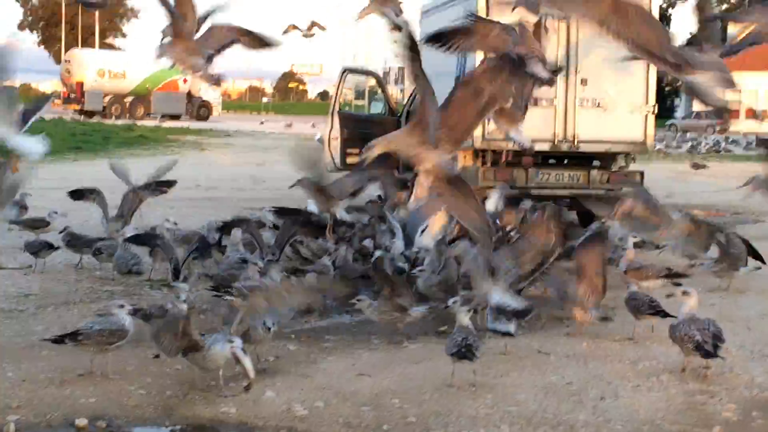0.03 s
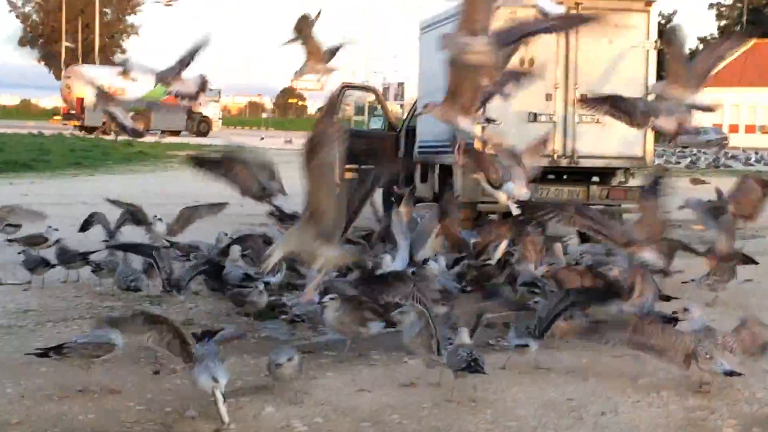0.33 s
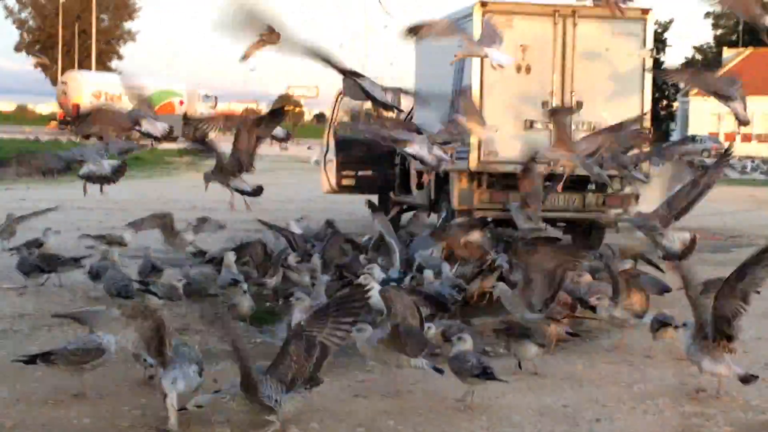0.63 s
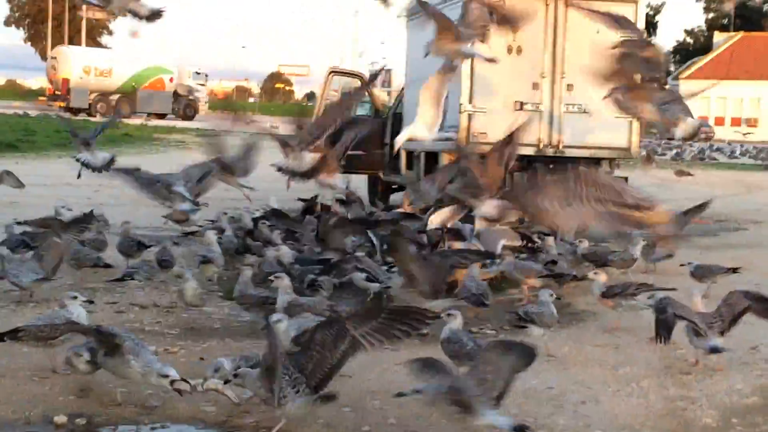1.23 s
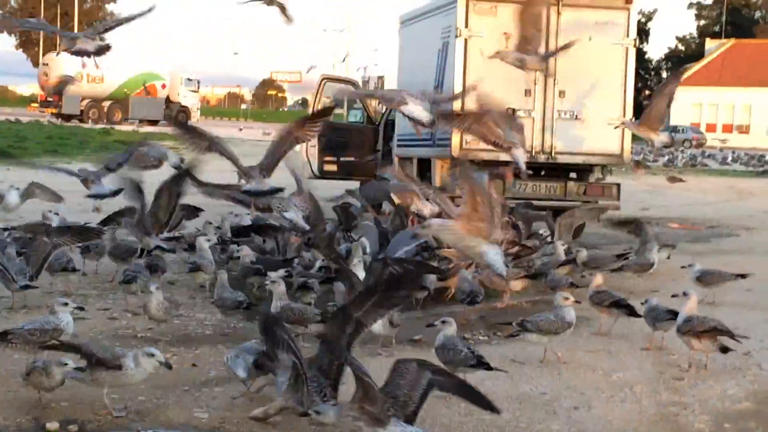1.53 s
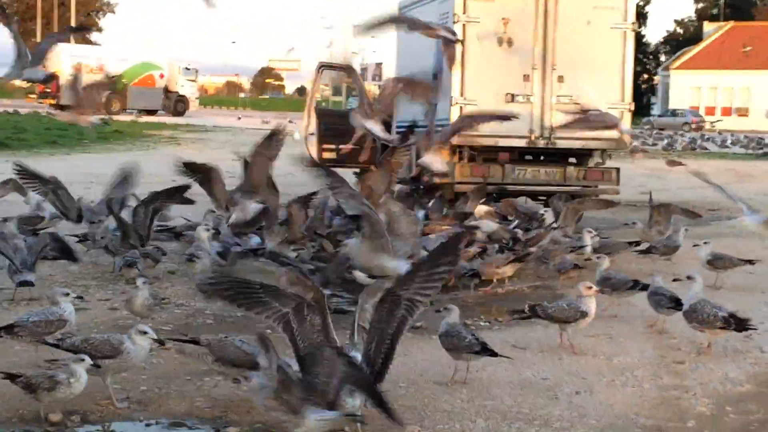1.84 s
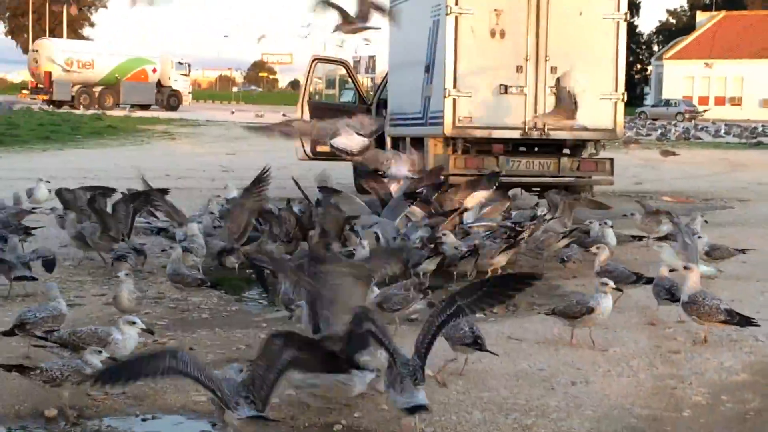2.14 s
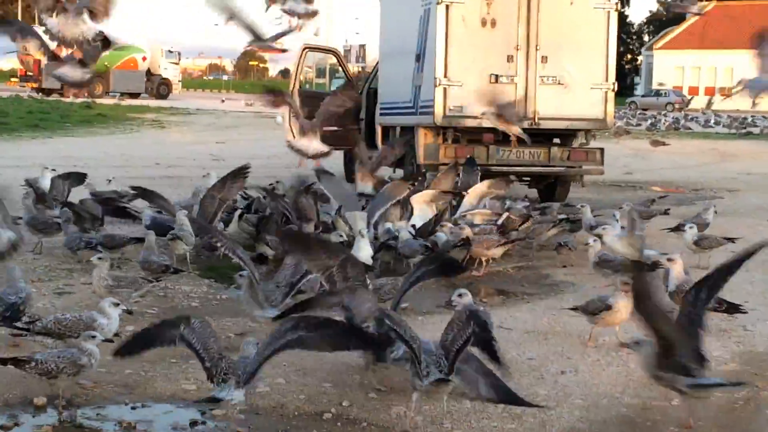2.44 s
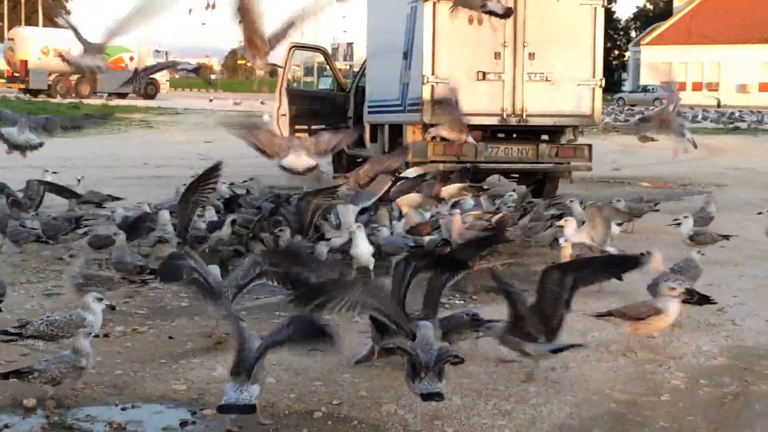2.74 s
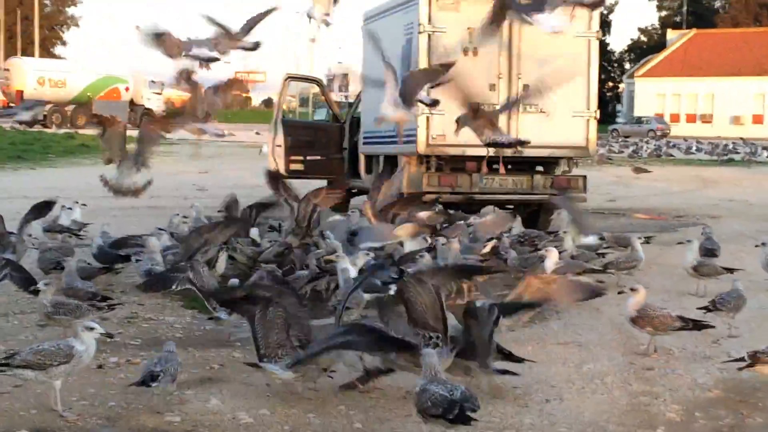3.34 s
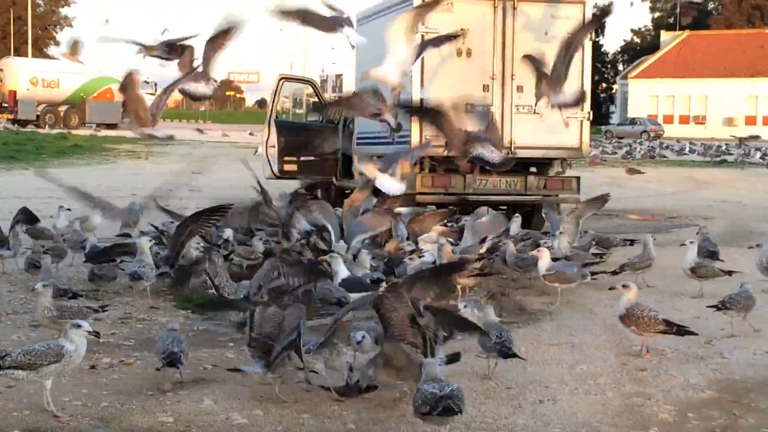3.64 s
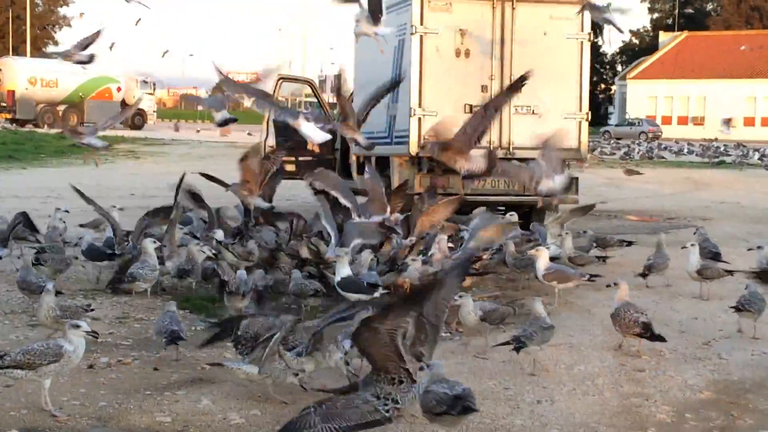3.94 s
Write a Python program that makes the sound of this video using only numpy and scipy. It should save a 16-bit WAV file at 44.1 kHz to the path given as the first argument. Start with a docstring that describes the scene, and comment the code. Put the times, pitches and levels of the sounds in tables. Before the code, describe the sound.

Many gulls squabble with shrill, overlapping cries while their wings thump and flutter.

```python
"""Gulls squabbling over food

A dense flock feeds on open ground behind a parked truck. Near birds squeal over the hoarse,
overlapping cries of the crowd, each cry a gliding stack of harmonics roughened by jitter.
Wings thump and swish as they push the air, and beaks and feet click on the grit."""
import sys
import numpy as np
from scipy.fft import rfft, irfft, next_fast_len
from scipy.io import wavfile
from scipy.ndimage import map_coordinates

SR = 44100
rng = np.random.default_rng(int(sys.argv[2]) if len(sys.argv) > 2 else 0)


def pcm_store(signal):
    """Save signal as 16-bit PCM."""
    levels = np.round(np.clip(np.atleast_2d(signal), -1, 1) * 32767)
    wavfile.write(sys.argv[1], SR, levels.astype(np.int16).T)


N = 176400
TOP_HZ = 15500


def amp(db):
    """Decibels to gain."""
    return 10 ** (np.asarray(db) / 20)


def unit(x):
    """Scale to rms 1."""
    return x / np.sqrt(np.mean(x ** 2) + 1e-20)


def curve(points):
    """Join (seconds, value) points into one value per sample."""
    return np.interp(np.arange(N) / SR, *np.transpose(points))


def wobble(rate, size):
    """A smooth random curve with rate knots a second."""
    knots = rng.standard_normal(1024)
    return map_coordinates(knots, [np.arange(size) * rate / SR], order=2, mode="grid-wrap")


def filtered(x, response):
    """Filter x by a gain given as a function of frequency."""
    size = next_fast_len(N + 8192)
    return irfft(rfft(x, size) * response(np.fft.rfftfreq(size, 1 / SR)), size)[:N]


def coloured(x, colour):
    """x through an EQ curve of (Hz, dB) points, at rms 1."""
    points_hz, db = np.transpose(colour)
    return unit(filtered(x, lambda hz: amp(np.interp(np.log(hz + 1), np.log(points_hz), db))))


def noise(colour):
    """Noise of rms 1 with the given spectrum."""
    return coloured(rng.standard_normal(N), colour)


def add(track, start_s, sound):
    """Mix a sound into the track from start_s."""
    i = round(start_s * SR)
    part = sound[max(-i, 0):max(N - i, 0)]
    track[max(i, 0):][:len(part)] += part


def bursts(events, rise_s, decay_s):
    """An envelope that peaks rise_s after each (seconds, dB) event and dies away."""
    t = np.arange(N) / SR
    envelope = np.zeros(N)
    for start_s, db in events:
        past_peak = t - start_s - rise_s
        envelope += amp(db) * np.exp(-np.maximum(-past_peak / rise_s, past_peak / decay_s).clip(0, 20))
    return envelope


def ground(rustle_db=-9.5, click_db=-5):
    """Beaks and feet strike the grit in sharp clicks, over a fine rustle of feathers and grit."""
    # The scuffle's ebb and flow. Each row: time in seconds, relative level in dB.
    scuffle = [(0.1, -39), (0.36, -32.5), (0.91, -41), (1.07, -33), (1.26, -39.5), (1.27, -36), (1.28, -28),
               (1.34, -35.5), (1.75, -33), (2.05, -43.5), (2.39, -37.5), (2.83, -40.5), (3.98, -35.5),
               (4.0, -43)]
    # Taps on the grit. Each row: start in seconds, relative peak in dB.
    taps = [(0.2464, -34), (1.287, -15), (1.303, -22), (1.3714, -38), (1.4214, -32.5), (1.4524, -31),
            (1.4774, -32), (1.7255, -27)]
    # Airy rustle and brittle click spectra. Each row: frequency in Hz, gain in dB.
    rustle_colour = [(3000, 6), (7000, 12.5), (8500, 9.5), (9700, 9.5), (11000, 3.5), (13000, -3.5),
                     (15000, -26)]
    click_colour = [(1500, -29), (5000, -23), (7000, 4.5), (8300, -17), (9800, 1.5), (11300, -14),
                    (12800, 6), (14000, -23), (15500, -11)]
    rustle = amp(curve(scuffle) + rustle_db + 2.25 * wobble(160, N)) * noise(rustle_colour)
    clicks = bursts(taps, rise_s=0.0003, decay_s=0.0034) * noise(click_colour)
    return rustle + amp(click_db) * clicks


def wings(beat_db=-8.5, flutter_db=-39, rise_s=0.0072, decay_s=0.024):
    """Near downstrokes thump and push puffs of air, over the flutter of many more wings."""
    # Downstrokes. Each row: start in seconds, relative peak in dB, puff over thump in dB.
    beats = [(.10, -30.5, 0), (.19, -35, 7), (0.254, -36, 5), (.385, -32, -1), (.48, -31.5, 1),
             (0.592, -24, -0.5), (.675, -29, -1), (0.784, -36, 5), (0.838, -26.5, -7), (0.893, -27, -3),
             (1.09, -37, 7), (1.28, -29.5, -5), (1.38, -35.5, 1), (1.68, -36, 2), (1.75, -40, 0),
             (1.83, -46, 3), (1.93, -35, 4), (2.02, -34.5, 6), (2.323, -26.5, -11), (2.38, -45, -6),
             (2.58, -36, -6), (2.79, -42, -9), (2.95, -29.5, -10), (3.021, -26.5, -19)]
    # Dull thump, deep puff and broad flutter spectra. Each row: frequency in Hz, gain in dB.
    thump_colour = [(30, -21), (60, -3), (110, 3), (170, -6), (280, -14.5), (1000, -50), (4000, -62)]
    puff_colour = [(20, -20), (40, -13), (60, 22), (85, -14), (160, -45)]
    flutter_colour = [(20, -27), (60, 3.5), (130, -2.5), (250, -9.5), (450, -5.5), (700, -1), (1100, 0.5),
                      (3000, -0.5), (9000, -26), (13000, -21), (15500, -49)]
    thump = bursts([(s, db) for s, db, _ in beats], rise_s, decay_s) * noise(thump_colour)
    puff = bursts([(s, db + deep) for s, db, deep in beats], rise_s, decay_s) * noise(puff_colour)
    flutter = amp(flutter_db + 3 * wobble(21.88, N)) * noise(flutter_colour)
    return amp(beat_db) * (thump + puff) + flutter


def flicker(t, rough, depth_db=1.8, rate_hz=55):
    """The wavering strength of one harmonic, at rms 1; clear cries hold steadier."""
    gains = amp(depth_db * min(rough / .3, 1) * rng.standard_normal(64))
    return unit(np.interp(t * rate_hz, np.arange(len(gains)), gains))


def cry(length_s, pitches, harmonics_db, rough):
    """One gull cry: harmonics on an arched glide, quavering, with jitter and flutter when hoarse."""
    attack_s, release_s = 0.015, 0.013
    quaver_hz, rasp_hz = 90, 650
    t = np.arange(int(max(length_s, .02) * SR)) / SR
    n, progress = len(t), t / t[-1]
    start, middle, end = pitches
    arch = (middle - (start + end) / 2) * (1 - (2 * progress - 1) ** 2)
    hz = start + (end - start) * progress + arch
    hz *= 1 + 0.00803 * wobble(quaver_hz, n) + 0.0492 * rough * wobble(rasp_hz, n)
    phase = (2 * np.pi * np.cumsum(hz) / SR).astype("float32")
    tone = sum(amp(db) * flicker(t, rough) * np.sin(k * phase + rng.uniform(0, 2 * np.pi))
               for k, db in enumerate(harmonics_db, 1))
    envelope = np.clip(t / attack_s, 0, 1) * np.clip((t[-1] - t) / release_s, 0, 1)
    flutter_db = 6.5 * rough * wobble(rasp_hz, n) + 1.88 * wobble(quaver_hz, n)
    return np.sqrt(2) * tone * envelope * unit(amp(flutter_db))


def chorus(pitch_hz, length_s, count, harmonics):
    """Cries scattered through the scene, each with its own pitch, length, glide and hoarseness."""
    out = np.zeros(N)
    for i, (when, pitch, length, fall, arch, rasp) in enumerate(rng.standard_normal((count, 6))):
        hz = pitch_hz * np.exp(.2 * pitch)
        seconds = length_s * np.exp(.4 * length)
        glide = hz * np.array([1, 1 + .035 * arch, 1 - 0.0605 * (1 + fall)])
        rough = min(0.286 * np.exp(rasp / 2), 1)
        harmonics_db = 2 * rng.standard_normal(harmonics)
        centre_s = (i + when) / count * N / SR
        add(out, centre_s - seconds / 2, cry(seconds, glide, harmonics_db, rough))
    return out


def crowd(pitch_hz=1559.7, shrill_hz=3800, yelp_db=-6, babble_db=-3, gruff_db=-51.5):
    """Cries, yelps and gruff calls overlap a distant babble; the din swells and turns shrill in waves."""
    # Swells of the din. Each row: time in seconds, relative level in dB.
    swells = [(.1, -24.5), (.25, -24.5), (.4, -24.5), (.6, -23), (.85, -23), (1.05, -24), (1.3, -22.5),
              (1.55, -23.5), (1.72, -26.5), (1.88, -26.5), (2.05, -27), (2.3, -25), (2.6, -23), (2.9, -24),
              (3.08, -24.5), (3.35, -23.5), (3.5, -28), (3.62, -24), (3.9, -26.5)]
    # Waves of shrillness. Each row: time in seconds, treble shelf gain in dB.
    shrillness = [(.1, 1.5), (.35, 2.5), (.6, 3), (.78, -3), (.88, -6), (1.2, -0.5), (1.4, -4), (1.6, 0.5),
                  (1.87, 3), (2.05, -3.5), (2.3, -0.5), (2.6, -2.5), (2.9, -4.5), (3.15, -11), (3.45, -2),
                  (3.63, 4), (3.78, -1), (4, -0.5)]
    # Spectra of the flock, merged far cries and low calls. Each row: frequency in Hz, gain in dB.
    flock_colour = [(600, -52), (1000, -23.5), (1300, -1), (1600, -3), (2000, -3), (2700, -2.5), (3300, -6),
                    (4200, -1.5), (5000, -8.5), (5700, -19.5), (6600, -17), (7500, -32.5), (10000, -35),
                    (13000, -55.5), (15500, -54.5)]
    babble_colour = [(500, -51), (900, -48), (1080, -10), (1330, 2.5), (1600, 5.5), (2000, 8), (2300, 1.5),
                     (2750, 6.5), (3300, 3.5), (4100, 2.5), (4900, -6), (5700, -26), (6600, -40),
                     (7500, -46), (12000, -37), (15000, -60)]
    gruff_colour = [(250, -5.5), (350, 4), (480, 7.5), (650, 14.5), (1000, -19), (1600, -64), (3000, -40)]
    cries = unit(chorus(pitch_hz, length_s=.15, count=190, harmonics=6))
    yelps = unit(chorus(pitch_hz, length_s=.045, count=90, harmonics=6))
    flock = coloured(cries + amp(yelp_db) * yelps, flock_colour)
    din = amp(-0.97) * flock + amp(babble_db) * noise(babble_colour)
    treble = filtered(din, lambda hz: 1 - 1 / (1 + (hz / shrill_hz) ** 10))
    din += treble * (amp(curve(shrillness)) - 1)
    gruff = coloured(chorus(pitch_hz=335.3, length_s=.15, count=70, harmonics=4), gruff_colour)
    return amp(curve(swells)) * din + amp(gruff_db) * gruff


def near_gulls(level_db=-0.5):
    """Close birds squeal and call gruffly; the stronger the squeal, the more its overtones ring."""
    # Squeals. Each row: start and length in seconds, pitch in Hz at start, middle and end,
    # relative levels of harmonics 1 to 4 in dB, roughness from 0 to 1.
    squeals = [(0.09, 0.16, 1570, 1590, 1550, -33, -29, -36, -43, 0.3),
               (0.17, 0.06, 1950, 1920, 1930, -36, -29, -47, -63, 0.2),
               (0.26, 0.14, 1580, 1580, 1520, -29, -28, -42, -42, 0.3),
               (0.33, 0.12, 2600, 2525, 2520, -46, -32, -61, -64, 0.2),
               (0.4, 0.05, 2020, 1990, 1960, -31, -45, -32, -57, 0.2),
               (0.42, 0.33, 2010, 1990, 1960, -30, -38, -52, -62, 0.7),
               (0.448, 0.052, 1930, 1890, 1915, -19, -20, -36, -56, 0.2),
               (0.522, 0.04, 1970, 1905, 1870, -17, -29, -43, -60, 0.35),
               (0.568, 0.04, 1970, 1900, 1890, -19, -28, -50, -64, 0.35),
               (0.607, 0.045, 2020, 1980, 1940, -23, -29, -55, -64, 0.4),
               (0.66, 0.04, 1980, 1915, 1870, -21, -50, -54, -58, 0.25),
               (0.672, 0.095, 1140, 1122, 1145, -59, -48, -25, -28, 0.15),
               (0.7, 0.11, 1480, 1490, 1450, -27, -42, -36, -41, 0.25),
               (0.72, 0.35, 1370, 1340, 1280, -30, -42, -46, -56, 0.2),
               (0.875, 0.035, 3300, 3450, 3600, -40, -44, -70, -85, 0.15),
               (0.92, 0.14, 3000, 2870, 2760, -27, -41, -64, -58, 0.16),
               (0.97, 0.09, 1460, 1480, 1490, -48, -42, -31, -62, 0.15),
               (1.03, 0.25, 1950, 1900, 1950, -31, -33, -58, -63, 0.5),
               (1.08, 0.26, 1270, 1240, 1240, -32, -33, -36, -42, 0.3),
               (1.0, 0.125, 3300, 3170, 3230, -42, -47, -55, -68, 0.25),
               (1.085, 0.1, 3420, 3260, 3260, -41, -41, -64, -78, 0.3),
               (1.175, 0.07, 3350, 3460, 3260, -43, -45, -68, -78, 0.3),
               (1.27, 0.04, 1580, 1590, 1600, -31, -27, -47, -52, 0.2),
               (1.32, 0.06, 1270, 1280, 1300, -41, -28, -43, -52, 0.2),
               (1.38, 0.34, 1330, 1380, 1310, -33, -31, -35, -56, 0.25),
               (1.345, 0.05, 980, 910, 860, -46, -43, -45, -50, 0.3),
               (1.525, 0.04, 1735, 1700, 1685, -39, -24, -52, -50, 0.2),
               (1.563, 0.09, 1760, 1735, 1680, -44, -48, -33, -54, 0.15),
               (1.582, 0.035, 1650, 1625, 1600, -51, -26, -46, -53, 0.15),
               (1.602, 0.05, 2200, 2190, 2220, -31, -38, -58, -62, 0.2),
               (1.64, 0.04, 1515, 1490, 1465, -35, -30, -30, -58, 0.15),
               (1.64, 0.043, 1815, 1780, 1755, -46, -24, -47, -54, 0.2),
               (1.7, 0.055, 1325, 1305, 1295, -33, -28, -36, -52, 0.15),
               (1.735, 0.325, 1360, 1325, 1140, -33, -29, -38, -54, 0.24),
               (1.81, 0.115, 1750, 1770, 1740, -38, -34, -33, -54, 0.7),
               (1.94, 0.03, 1880, 1840, 1800, -27, -36, -54, -62, 0.25),
               (2.09, 0.04, 2050, 2010, 1980, -30, -29, -65, -66, 0.3),
               (2.11, 0.05, 1680, 1650, 1630, -25, -36, -39, -46, 0.2),
               (2.19, 0.13, 3020, 2900, 3050, -28, -45, -64, -72, 0.3),
               (2.225, 0.04, 1480, 1495, 1490, -30, -31, -31, -50, 0.2),
               (2.26, 0.08, 1530, 1550, 1520, -30, -38, -39, -58, 0.25),
               (2.305, 0.035, 2050, 2010, 1980, -28, -41, -60, -60, 0.2),
               (2.33, 0.07, 1370, 1345, 1330, -33, -28, -40, -48, 0.2),
               (2.39, 0.06, 1930, 1890, 1880, -28, -44, -63, -66, 0.25),
               (2.44, 0.12, 1460, 1440, 1415, -31, -26, -39, -57, 0.25),
               (2.455, 0.035, 2090, 2065, 2040, -27, -30, -54, -62, 0.25),
               (2.55, 0.075, 1410, 1440, 1455, -27, -27, -26, -57, 0.2),
               (2.63, 0.085, 1440, 1495, 1510, -29, -32, -30, -54, 0.25),
               (2.64, 0.17, 1270, 1170, 1040, -35.5, -46, -48, -52, 0.3),
               (2.705, 0.06, 1870, 1850, 1825, -38, -31, -60, -66, 0.2),
               (2.72, 0.12, 1350, 1335, 1320, -33, -29, -36, -54, 0.2),
               (2.845, 0.06, 1750, 1715, 1685, -45, -28, -60, -67, 0.2),
               (2.99, 0.18, 3300, 3150, 2850, -33, -46, -67, -73, 0.25),
               (3.1, 0.06, 1490, 1490, 1460, -26, -32, -48, -56, 0.15),
               (3.135, 0.23, 1470, 1375, 1450, -31, -23.5, -37, -54, 0.1),
               (3.25, 0.065, 1840, 1855, 1850, -30, -32, -54, -60, 0.2),
               (3.295, 0.16, 3335, 3250, 3205, -25, -37, -51, -64, 0.11),
               (3.32, 0.15, 1310, 1250, 1230, -36, -28, -43, -58, 0.2),
               (3.385, 0.045, 1820, 1780, 1740, -38, -28, -42, -58, 0.35),
               (3.47, 0.09, 1370, 1355, 1330, -28, -32, -31, -50, 0.15),
               (3.55, 0.13, 1600, 1630, 1600, -34, -30, -34, -48, 0.9),
               (3.558, 0.033, 3150, 3180, 3200, -40, -41, -61, -72, 0.2),
               (3.645, 0.07, 1380, 1335, 1315, -35, -42, -24, -35, 0.17),
               (3.718, 0.055, 1265, 1220, 1185, -36, -29, -41, -48, 0.15),
               (3.752, 0.08, 1205, 1140, 1080, -36, -30, -27, -44, 0.25),
               (3.752, 0.052, 3400, 3130, 3120, -32, -38, -51, -70, 0.2),
               (3.775, 0.055, 1620, 1700, 1725, -36, -41, -36, -54, 0.2),
               (3.81, 0.22, 1720, 1685, 1575, -22.5, -35, -36, -44, 0.1)]
    # Sheen of harmonics 5 to 8. Each row: frequency in Hz, dB over the mean of the first four.
    overtones = [(4500, -9), (6000, -14), (7500, -37), (8500, -25), (10000, -27.5), (12000, -23.5),
                 (13500, -30), (15000, -42)]
    # Low calls. Each row: start and length in seconds, pitch in Hz, fundamental's relative level in dB.
    gruff_calls = [(0.82, 0.12, 315, -55.5), (1.699, 0.21, 316.4, -47), (2.29, 0.082, 283.6, -49.5)]
    out = np.zeros(N)
    for start_s, length_s, start_hz, middle_hz, end_hz, *lower_db, rough in squeals:
        upper_hz = middle_hz * np.arange(5, 9)
        upper_db = np.mean(lower_db) + np.interp(upper_hz, *np.transpose(overtones))
        upper_db[upper_hz >= TOP_HZ] = -200
        add(out, start_s, cry(length_s, (start_hz, middle_hz, end_hz), [*lower_db, *upper_db], rough))
    for start_s, length_s, hz, db in gruff_calls:
        add(out, start_s, cry(length_s, (hz, hz, hz), db - 5.5 * np.arange(4), rough=0.56))
    return amp(level_db) * out


def scene():
    """Voices, wings and ground noise in the open air, in mono."""
    return (near_gulls() + crowd() + wings() + ground())[None]


def record(dry):
    """The sound cuts in after a moment; nothing is kept above the band limit."""
    gate = np.arange(N) / SR > .083
    return filtered(dry[0] * gate, lambda hz: hz < TOP_HZ)[None]


dry = scene()
out = record(dry)
pcm_store(out)
```